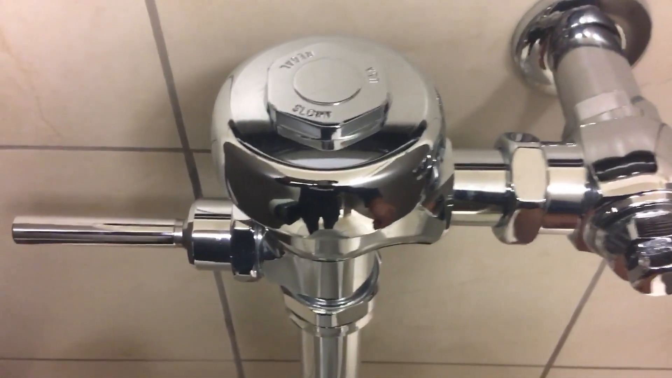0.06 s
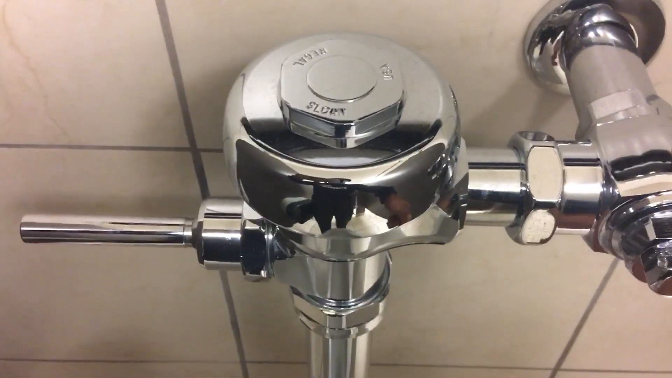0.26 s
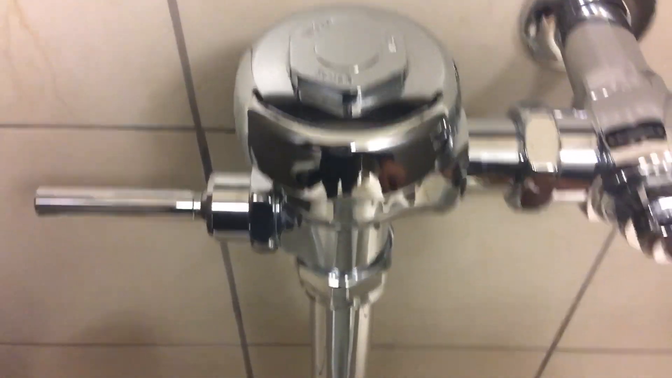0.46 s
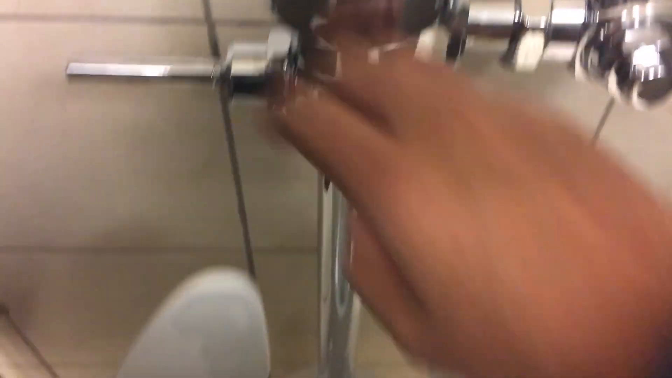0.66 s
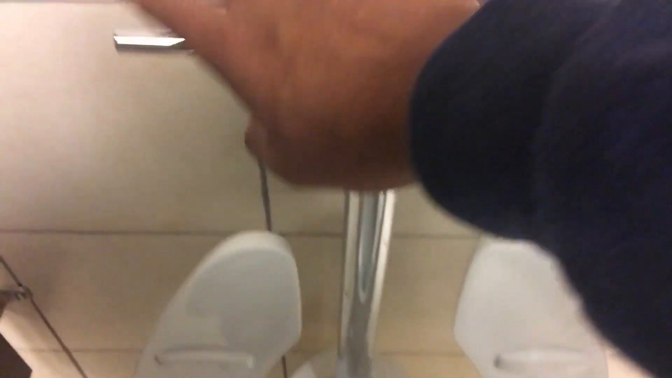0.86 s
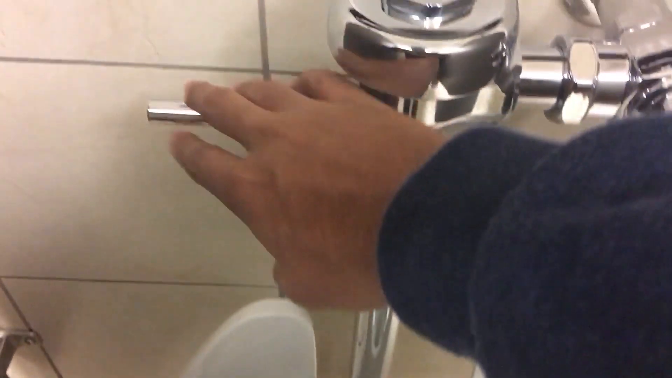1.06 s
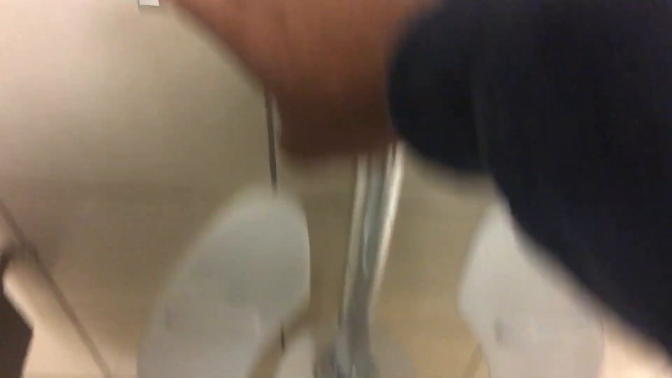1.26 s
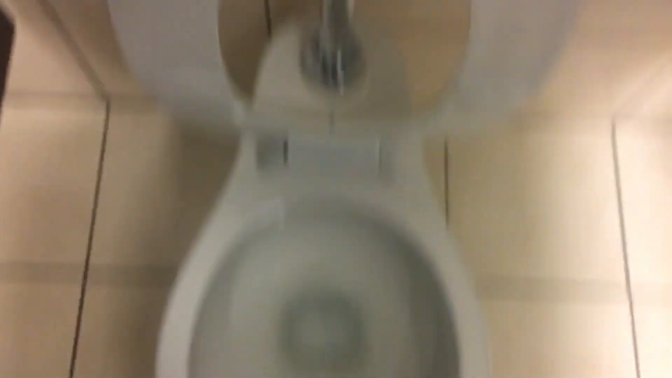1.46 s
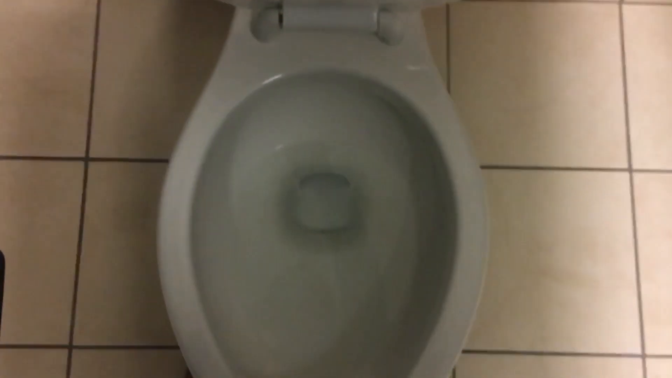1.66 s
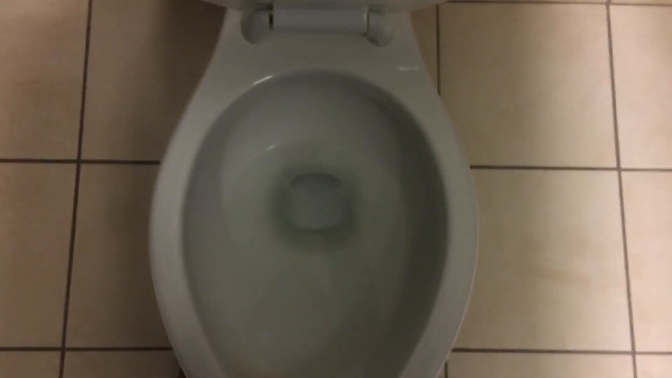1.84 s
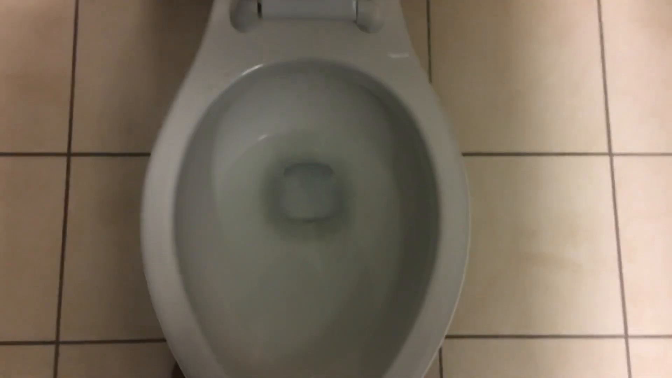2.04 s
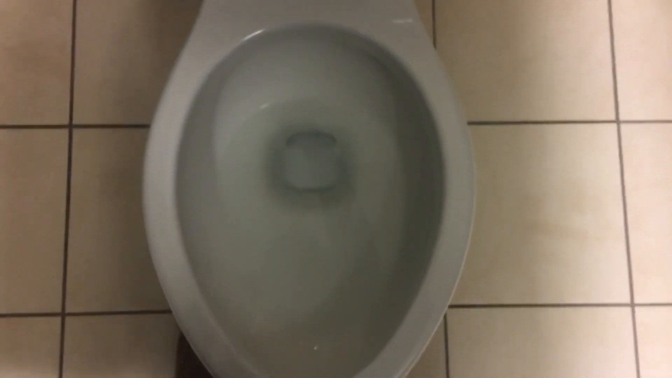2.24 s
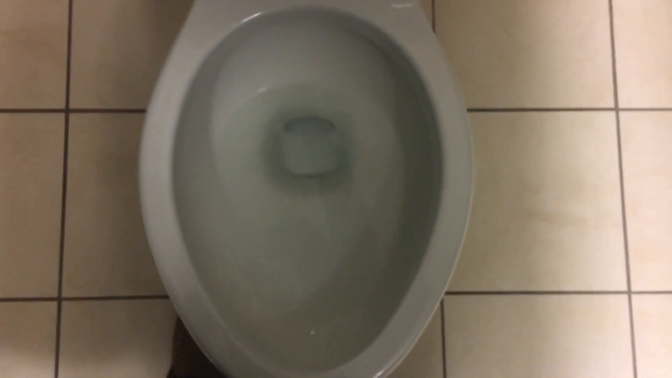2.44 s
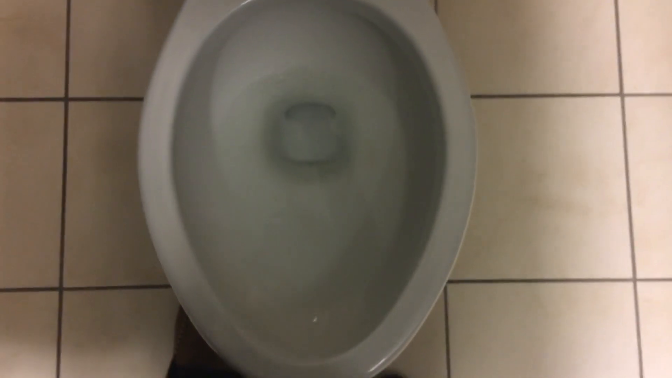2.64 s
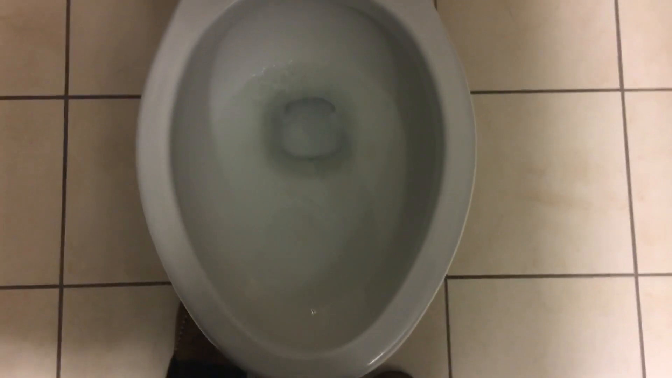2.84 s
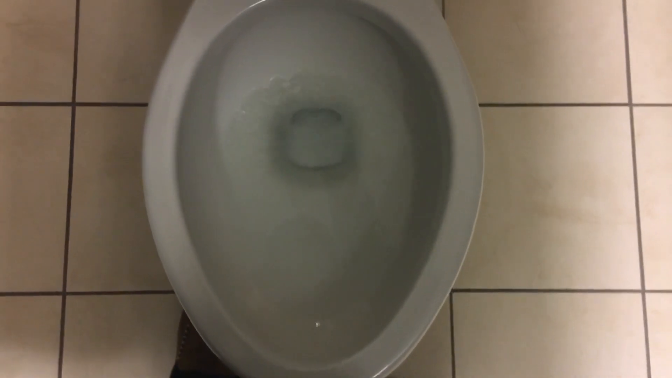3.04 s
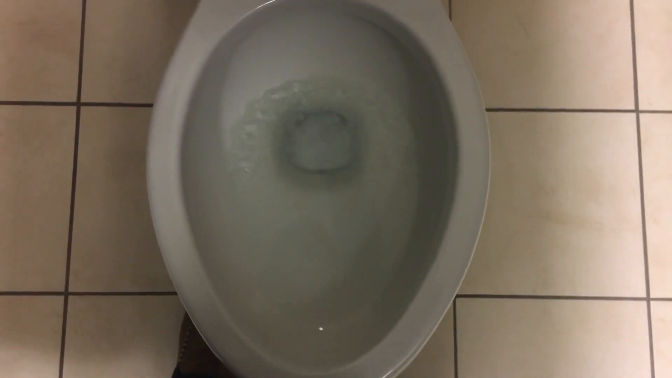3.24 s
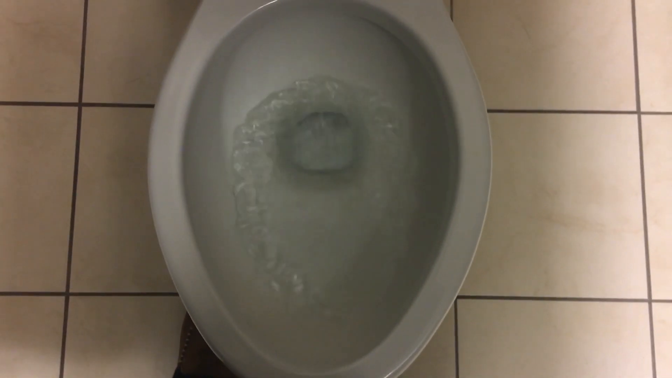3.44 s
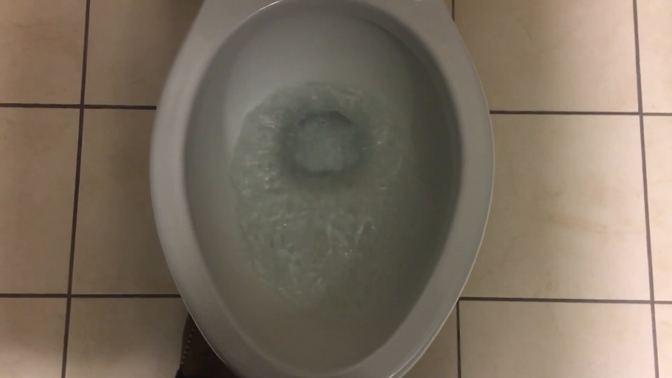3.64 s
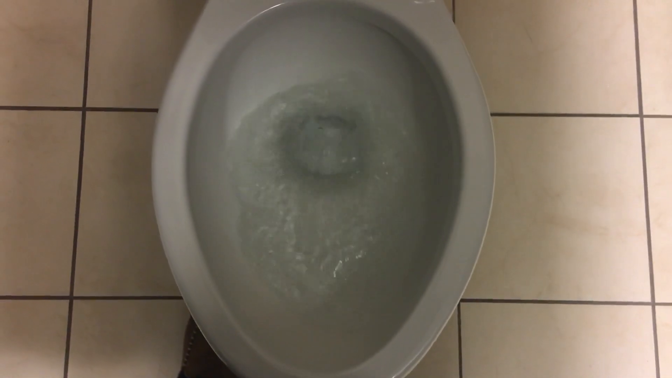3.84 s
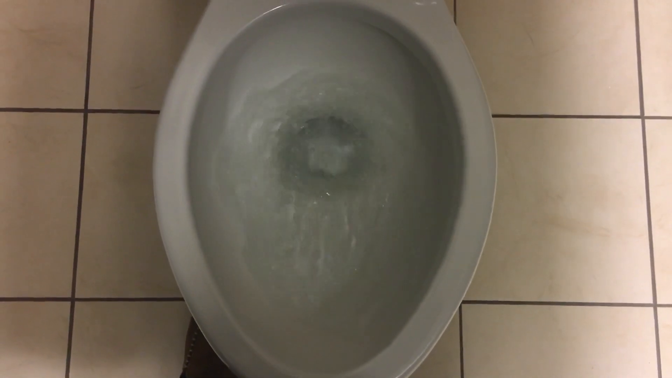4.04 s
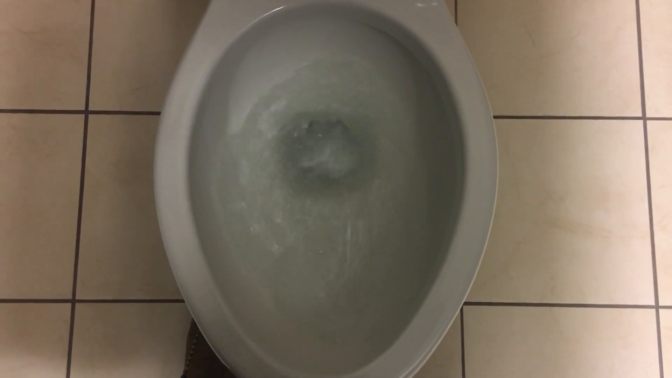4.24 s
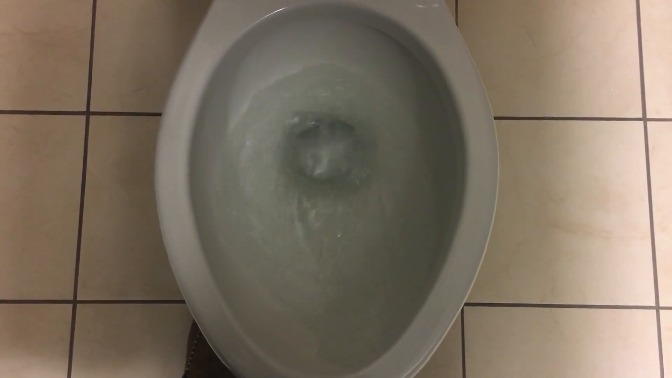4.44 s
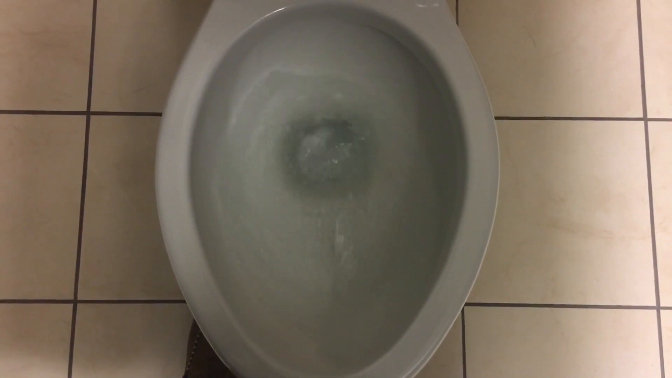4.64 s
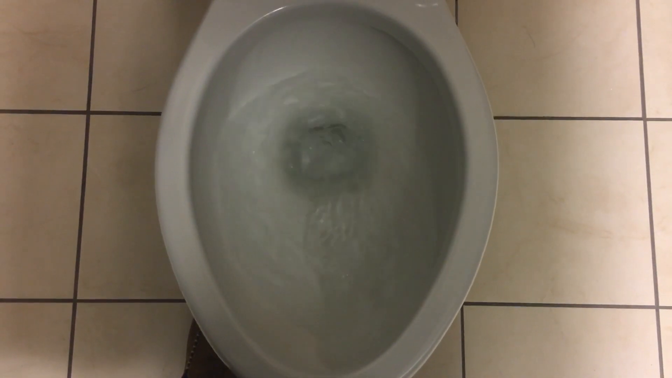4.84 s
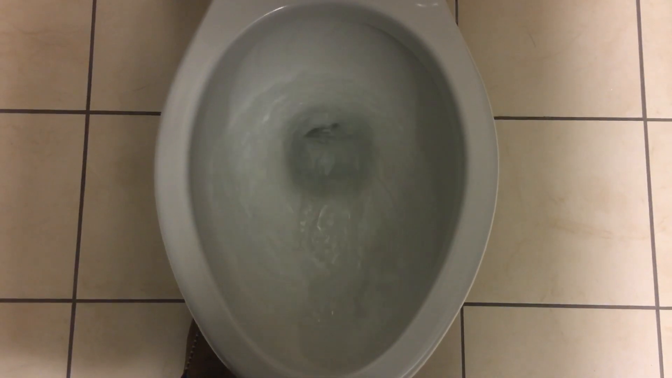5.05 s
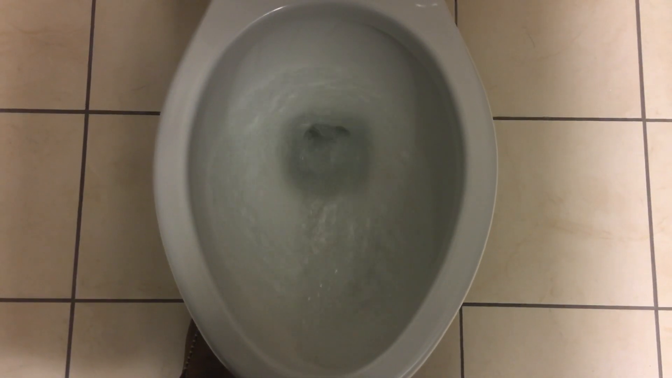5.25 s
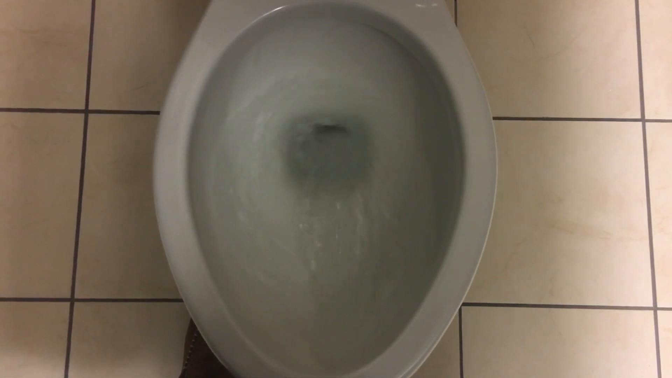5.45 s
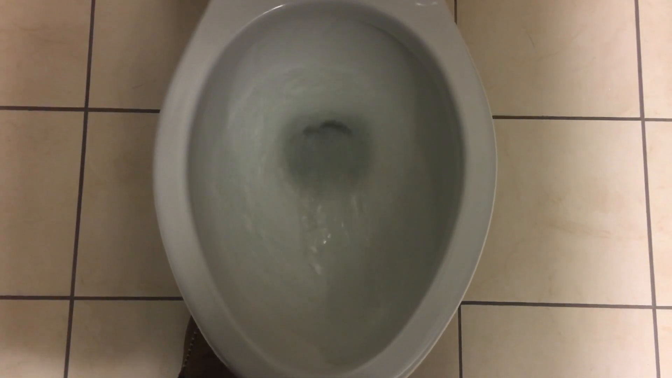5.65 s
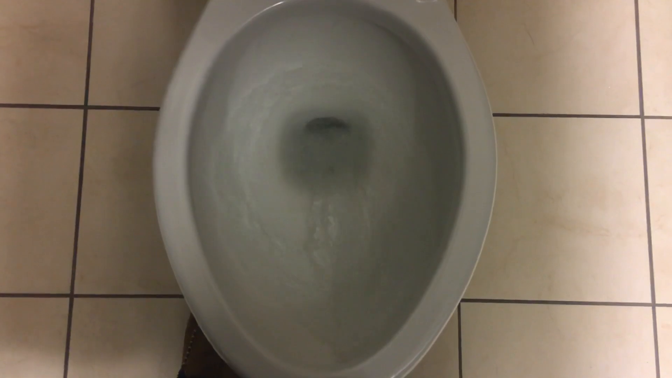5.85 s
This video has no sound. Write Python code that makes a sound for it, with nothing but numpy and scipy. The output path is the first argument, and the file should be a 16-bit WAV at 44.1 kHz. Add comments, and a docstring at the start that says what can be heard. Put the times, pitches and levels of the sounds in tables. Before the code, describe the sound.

A quiet, low ventilation rumble runs throughout in a tiled restroom, heard from just above a toilet. From about 0.5 to 1.3 seconds a sleeve rustles faintly, and at 1.1 the flush handle gives a soft knock and thump. At about 2 seconds the valve opens with a sharp metallic clunk and a few low thuds, then hisses steadily while the pipe rumbles and hums. A faint, brief whistle comes at 2.6 with small spits of air. From 2.8 spluttering jets build into a loud roar of water, strongest around 3.5, with bright spray and churning. After 4 seconds the rush eases slightly and turns hollower as the bowl drains, with sharp splashes on the porcelain. The drain slurps near 4.9 and gulps repeatedly from 4.7 onward. The water is still rushing at the end, around 6 seconds.

```python
"""Rim jets roar into the bowl of a flush-valve toilet, heard from just above it in a tiled restroom.
First a sleeve rustles, the handle knocks, the valve hisses and water rumbles up the pipe, spitting air.
Then the jets open up; as the bowl drains its resonances shift, spray spatters and the trap gulps.
Ventilation rumbles underneath."""
import sys
import numpy as np
from scipy import signal
from scipy.fft import rfft, irfft, next_fast_len
from scipy.io import wavfile
from scipy.ndimage import uniform_filter1d

SR = 44100
rng = np.random.default_rng(int(sys.argv[2]) if len(sys.argv) > 2 else 0)


def transcribe(u):
    """Save the signal u as a 16-bit wav file named by the first command-line argument.

    u: samples, shape (n,) or (channels, n), limited to [-1, 1]; the rate is SR.
    q: integer samples, one column per channel.
    """
    v = np.clip(np.atleast_2d(u).T, -1, 1)
    q = np.round(v * 32767).astype(np.int16)
    wavfile.write(sys.argv[1], SR, q)


N = 260190
TIME = np.arange(N) / SR
CRACK_S, LIFT_S, LIFT_RISE_S = 2.028, 2.115, 0.062  # valve cracks open, then lifts off its seat
JET_START_S, JET_RISE_S = 2.8, 0.27

# valve body resonances: (centre [Hz], width [Hz], lift [dB])
VALVE_MODES = [(1060, 220, 6.5), (1520, 36, 10), (2047, 68, 10.5), (2355, 350, 11), (3790, 130, 8),
               (4200, 170, 6), (5680, 260, 4), (6710, 130, 6), (8800, 200, 1), (9300, 910, 3),
               (12200, 510, 4), (13800, 600, 8.5)]
# drained bowl and rim channel resonances: (centre [Hz], width [Hz], lift [dB])
DRAINED_MODES = [(392.5, 9.5, 14), (470, 84, -1.5), (665, 43, 9.5), (825, 24, 13), (1046, 35, 9.5),
                 (1245, 36, 8), (1335, 26, 10), (1730, 42, 1.5), (1824, 64, -12.5), (1980, 22, 7),
                 (2100, 220, -4.5), (2339, 40, 8.5), (2560, 110, 4.5), (2884, 93, 7), (3240, 120, 8),
                 (3680, 66, 5), (3840, 85, 0.5), (4370, 75, 7)]


def amp(db):
    """Decibels to gain."""
    return 10 ** (np.asarray(db) / 20)


def unit(x):
    """Scale to rms 1."""
    return x / np.sqrt(np.mean(x ** 2) + 1e-20)


def read(points, hz):
    """Interpolate on a log-frequency axis."""
    f, value = np.transpose(points)
    return np.interp(np.log(hz + 1), np.log(f + 1), value)


def add(mix, s, sound):
    """Mix a sound in at time s."""
    part = mix[round(s * SR):][:len(sound)]
    part += sound[:len(part)]


def ramp(start_s, length_s):
    """Linear rise from 0 to 1, then hold."""
    return np.clip((TIME - start_s) / length_s, 0, 1)


def release(s, fall_s):
    """Hold 1 until s, then decay."""
    return np.exp(-np.clip((TIME - s) / fall_s, 0, 20))


def bell(s, width_s):
    """Gaussian swell to 1 at s."""
    return np.exp(-np.minimum(((TIME - s) / width_s) ** 2, 20))


def surge(s, rise_s, fall_s):
    """Swell to 1 at s, then decay."""
    return np.where(TIME < s, bell(s, rise_s), release(s, fall_s))


def drift(rate_hz, size=N):
    """Smooth random wander, rms 1."""
    lowpass = np.exp(-np.minimum((np.fft.rfftfreq(size, 1 / SR) / rate_hz) ** 2, 20))
    return unit(irfft(rfft(rng.standard_normal(size)) * lowpass, size))


def lift(modes, hz):
    """Cavity peaks and notches in dB."""
    return sum(db * np.exp(-np.minimum(2 * ((hz - centre) / width) ** 2, 20))
               for centre, width, db in modes)


def colour(x, spectrum, modes=()):
    """Filter by a broad spectrum and resonances; rms 1."""
    size = next_fast_len(N + SR // 4)
    hz = np.fft.rfftfreq(size, 1 / SR)
    gain = amp(read(spectrum, hz) + lift(modes, hz))
    return unit(irfft(rfft(np.resize(x, size)) * gain, size)[:N])


def turbulence(patch_db, flicker_db, bins, frames):
    """Eddying noise: level varies in time-frequency patches, plus a broadband flicker."""
    z = signal.stft(rng.standard_normal(N), nperseg=256)[2]
    patches = uniform_filter1d(rng.standard_normal(z.shape), bins, axis=0)
    patches = unit(uniform_filter1d(patches, frames, axis=1))
    flicker = unit(uniform_filter1d(rng.standard_normal(z.shape[1]), frames))
    eddies = z * amp(patch_db * patches + flicker_db * flicker)
    return unit(signal.istft(eddies, nperseg=256)[1][:N])


def bubble(hz, t60_s, glide):
    """Damped tone, soft onset; glide lifts the pitch, as in an air pocket nearing the surface."""
    age = np.arange(int(t60_s * SR) + 2) / (t60_s * SR)
    turns = hz * t60_s * age * (1 + glide * age / 2)
    return np.sin(2 * np.pi * turns) * amp(-60 * age) * (1 - np.exp(-age * 40))


def bubbles(low_hz, high_hz, per_s, cycles, spread_db):
    """Bubbles at random times and pitches, a few strong; rms 1."""
    out = np.zeros(N)
    draws = rng.random((8000, 3))
    for when, pitch, strength in draws[:int(per_s * N / SR)]:
        hz = low_hz * (high_hz / low_hz) ** pitch
        gain = np.sqrt(hz) * amp(spread_db * min(-np.log(strength), 3))
        add(out, when * N / SR, gain * bubble(hz, cycles / hz, glide=0.041))
    return unit(out)


def bursts(rows, modes, attack_s):
    """Short blows: resonant noise bands, fast attack, exponential decay."""
    out, t = np.zeros(N), np.arange(SR // 2) / SR
    hz = np.fft.rfftfreq(len(t), 1 / SR)
    for s, db, centre_hz, octaves, t60_s in rows:
        band = np.exp(-0.5 * (np.log2((hz + 1) / centre_hz) / octaves) ** 2) * amp(lift(modes, hz))
        noise = unit(irfft(rfft(rng.standard_normal(len(t))) * band, len(t)))
        envelope = (1 - np.exp(-t / attack_s)) * amp(-60 * t / t60_s)
        add(out, s, amp(db) * envelope * noise)
    return out


def restroom(x):
    """Tile reflections, dying fastest in the treble."""
    # room decay: (frequency [Hz], t60 [s])
    decay = [(100, 0.43), (1000, 0.88), (4000, 0.25), (15000, 0.13)]
    size = SR // 2
    taps = rng.standard_normal(size) * (rng.random(size) < 0.1)
    taps[:201] = 0  # pre-delay
    hz, t, z = signal.stft(taps, SR, nperseg=256)
    tail = signal.istft(z * amp(-60 * t / read(decay, hz)[:, None]), SR, nperseg=256)[1]
    return signal.fftconvolve(x, tail / np.linalg.norm(tail))[:N]


def ventilation(level_db=-43):
    """Steady low rumble of the building's air."""
    # air noise: (frequency [Hz], level [dB])
    spectrum = [(20, -41), (35, -7.5), (58, 4), (83, -10.5), (140, -6), (175, -15), (250, -20.5),
                (350, -30.5), (550, -40), (1100, -44.5), (2000, -48.5), (4800, -54), (8000, -54),
                (12500, -50.5), (15500, -51)]
    return amp(level_db) * colour(rng.standard_normal(N), spectrum)


def sleeve():
    """Cloth slides as the arm comes up, presses the handle and draws back."""
    # arm strokes: (peak time [s], level [dB], rise [s], fall [s])
    strokes = [(.62, -63, .11, .25), (.94, -57, 0.15, 0.38), (1.27, -67, 0.09, .1)]
    # cloth friction: (frequency [Hz], level [dB])
    spectrum = [(150, 21), (400, 14), (900, 3.5), (1600, 0), (2300, 1), (5000, -2), (6200, -1), (8000, -7),
                (12300, 1.5), (15500, -5)]
    rubbing = turbulence(patch_db=2.2, flicker_db=0.6, bins=4, frames=25)
    motion = sum(amp(db) * surge(s, rise_s, fall_s) for s, db, rise_s, fall_s in strokes)
    return motion * colour(rubbing, spectrum)


def squeaks():
    """Faint squeaks and a valve whistle: narrow noise bands that glide, swell and fade."""
    # glides: (time [s], length [s], relative level [dB], start [Hz], end [Hz], width [Hz])
    glides = [(0.02, 0.096, -72, 1387, 1300, 70), (0.071, 0.047, -67, 2600, 2400, 400),
              (1.612, 0.064, -64, 1880, 1700, 220), (1.614, 0.057, -72, 3000, 3200, 300),
              (1.68, 0.22, -81, 1790, 1740, 200), (2.591, .15, -46, 5360, 6080, 300)]
    out = np.zeros(N)
    for s, length_s, db, start_hz, end_hz, width_hz in glides:
        size = int(length_s * SR)
        phase = 2 * np.pi * np.cumsum(np.linspace(start_hz, end_hz, size)) / SR
        a, b = (drift(width_hz / 2, size=SR)[:size] for _ in range(2))
        fuzz = unit(a * np.cos(phase) + b * np.sin(phase))
        add(out, s, amp(db) * fuzz * np.sin(np.linspace(0, np.pi, size)))
    return out


def knocks():
    """Handle and valve knocks and the first spurt ring the valve body."""
    # blows: (time [s], level [dB], centre [Hz], width [octaves], t60 [s])
    blows = [(1.007, -60, 1150, .4, 0.08), (1.085, -45.5, 1030, 0.41, 0.05), (1.09, -47, 12000, 0.36, .02),
             (1.969, -53, 2200, 0.92, 0.07), (1.972, -55, 890, 0.18, 0.25), (2.065, -27, 3400, 0.54, 0.04),
             (2.066, -30, 1100, 1.2, 0.081), (2.065, -37, 10000, .6, .04), (2.183, -34, 1150, 0.59, 0.046),
             (2.178, -30.5, 14000, 0.46, 0.34)]
    return bursts(blows, VALVE_MODES, attack_s=0.0014)


def jolts():
    """The handle thumps and the water column jolts."""
    # low thumps: (time [s], level [dB], pitch [Hz], t60 [s])
    thumps = [(1.091, -27, 94, 0.1), (2.04, -21.5, 73.4, 0.19), (2.066, -21, 130, 0.23),
              (2.131, -15.5, 100, 0.1), (2.182, -20, 110, .1), (2.424, -18, 85, 0.15)]
    out = np.zeros(N)
    for s, db, hz, t60_s in thumps:
        add(out, s, amp(db) * bubble(hz, t60_s, glide=0))
    return out


def valve(leak_db=-53, open_db=-37.5):
    """Water squeezes through the valve seat: a leak, then a full hiss."""
    # seat hiss: (frequency [Hz], level [dB])
    spectrum = [(260, -17), (450, 0.5), (750, -4), (1400, -4.5), (1800, -6.5), (2400, -11), (2800, -6.5),
                (3900, -10), (5500, -5.5), (8000, -6), (11000, -2.5), (14200, -5), (15500, -0.5)]
    hiss = turbulence(patch_db=1.5, flicker_db=1.0, bins=6, frames=8)
    opening = amp(leak_db) * ramp(CRACK_S, 0.01) + amp(open_db) * ramp(LIFT_S, LIFT_RISE_S)
    return opening * colour(hiss, spectrum, VALVE_MODES)


def pipe(purged_s=3.334, settle_s=0.13, hum_hz=91, wander_hz=2.22, waver_db=2.0):
    """The pipe shakes and hums at its lowest resonance, hardest until its air is driven out."""
    # pipe rumble: (frequency [Hz], level [dB])
    rumble_spectrum = [(30, -24), (62, 4.5), (85, 0.5), (110, -2.5), (135, -1), (160, -5), (190, -13.5),
                       (260, -7), (330, -14), (420, -21), (600, -44)]
    # last air drumming out of the rim channel: (frequency [Hz], level [dB])
    purge_spectrum = [(80, -15), (140, 2.5), (185, -9), (255, -3.5), (340, -5), (400, -8), (550, -15.5),
                      (900, -47)]
    # pipe resonances: (centre [Hz], width [Hz], lift [dB])
    modes = [(140.4, 12, 7), (280, 25, 3.5), (336, 8.1, 6.5)]
    # hum swells once the bowl runs low: (time [s], level [dB])
    swells = [(4.99, -38.5), (5.55, -42), (5.83, -40.5)]
    first_rush = amp(-36) * release(LIFT_S, fall_s=0.25)
    trapped_air = amp(-38) * release(purged_s, settle_s)
    shaking = ramp(CRACK_S, 0.07) * (amp(-45) + first_rush + trapped_air)
    rumble = shaking * colour(rng.standard_normal(N), rumble_spectrum, modes)
    drumming = amp(-30.5) * surge(purged_s, rise_s=0.3, fall_s=settle_s)
    purge = drumming * colour(rng.standard_normal(N), purge_spectrum, modes)
    hum_gain = amp(-50) + amp(-33) * release(purged_s, fall_s=0.33)
    hum_gain += sum(amp(db) * bell(s, width_s=0.15) for s, db in swells)
    turns = np.cumsum(hum_hz + wander_hz * drift(rate_hz=7.9)) / SR
    hum_gain *= ramp(LIFT_S, LIFT_RISE_S) * amp(waver_db * drift(rate_hz=2.4))
    return rumble + purge + hum_gain * unit(np.sin(2 * np.pi * turns))


def flow(unsteady_db=0.47):
    """Force of the water in dB; drives jets, spray and churn."""
    # force through the rim jets: (time [s], relative level [dB])
    force = [(2.86, -43), (3.18, -30.5), (3.31, -18), (3.48, -14.5), (3.8, -18.5), (3.83, -15), (4.07, -19),
             (4.25, -19), (4.77, -21.5), (4.88, -19), (5.04, -25), (5.22, -21.5), (5.36, -24), (5.58, -21),
             (5.76, -29), (5.81, -19), (5.84, -25.5), (5.9, -24)]
    return np.interp(TIME, *np.transpose(force)) + unsteady_db * drift(rate_hz=5.3)


def emptied():
    """Share of the bowl drained."""
    # drain curve: (time [s], share emptied [0-1])
    curve = [(4.0, 0.22), (4.35, 0.62), (4.65, 0.89), (5.1, 0.84)]
    return np.interp(TIME, *np.transpose(curve))


def in_bowl(x, spectrum):
    """Bowl resonances crossfade from full to drained as the water falls."""
    # full bowl and rim channel resonances: (centre [Hz], width [Hz], lift [dB])
    full_modes = [(282, 71, 2.5), (399.5, 16, 11.5), (650, 230, 3), (1022, 70, 8), (1168, 106, -24),
                  (1275, 26, 10), (1351, 57, 9.5), (1460, 92, -19), (1616, 26, 12.5), (1963, 31, 7.5),
                  (2280, 115, 7), (2600, 60, -11), (2915, 51, 5.5), (2980, 79, 8.5), (3220, 92, 1),
                  (3565, 58, 10.5), (4300, 190, 4)]
    share = emptied()
    return (1 - share) * colour(x, spectrum, full_modes) + share * colour(x, spectrum, DRAINED_MODES)


def slurp(level_db=-32.5, flutter_db=3.6):
    """The trap sucks air with a fluttering, hollow rasp."""
    # suction rasp: (frequency [Hz], level [dB])
    spectrum = [(600, -30), (1000, -7), (1250, 0), (1450, -6), (2000, -28), (6000, -50)]
    rasp = amp(flutter_db * drift(rate_hz=40)) * rng.standard_normal(N)
    return amp(level_db) * surge(4.92, rise_s=0.24, fall_s=0.3) * colour(rasp, spectrum)


def gulps(pitch_scatter=0.174, stagger_s=0.014, fragment_db=-6, fragments=6):
    """Each gulp is one large bubble breaking into a few weaker ones."""
    # air pockets swallowed by the trap: (time [s], level [dB], pitch [Hz], t60 [s])
    pockets = [(4.694, -23, 1105, 0.043), (4.794, -21, 1080, 0.082), (4.955, -21.5, 1057, 0.21),
               (4.985, -21, 1137, .12), (5.158, -15.5, 927, 0.043), (5.208, -19, 608, 0.045),
               (5.402, -27, 1160, 0.059), (5.525, -24, 784, 0.079), (5.671, -21.5, 920, 0.045),
               (5.721, -19.5, 1094, 0.093), (5.728, -23, 510, .045), (5.83, -21.5, 930, 0.09)]
    out = np.zeros(N)
    for s, db, hz, t60_s in pockets:
        add(out, s, amp(db) * bubble(hz, t60_s, glide=0.091))
        waits_s = rng.exponential(stagger_s, fragments)
        ratios = np.exp(pitch_scatter * rng.standard_normal(fragments))
        for wait_s, ratio in zip(waits_s, ratios):
            add(out, s + wait_s, amp(db + fragment_db) * bubble(hz * ratio, t60_s / 2, glide=0.21))
    return out


def splashes(t60_s=0.042, max_octaves=0.74):
    """Short slaps ring in the bowl; the higher ones span fewer octaves."""
    # spits of air and slaps of water: (time [s], level [dB], centre [Hz])
    slaps = [(2.597, -35, 2190), (2.637, -35, 2750), (2.897, -36, 2630), (2.94, -34.5, 2820),
             (3.003, -33, 2540), (3.075, -27.5, 3000), (3.182, -28, 7130), (3.207, -21.5, 4500),
             (4.338, -14, 5000), (4.618, -16.5, 3500), (4.92, -9, 7900), (5.148, -15.5, 5000),
             (5.224, -13, 4310), (5.332, -10.5, 12100), (5.406, -9, 7450), (5.463, -12, 11100),
             (5.779, -14, 4470), (5.809, -13, 5870)]
    rows = [(s, db, hz, min(4100 / hz, max_octaves), t60_s) for s, db, hz in slaps]
    return bursts(rows, DRAINED_MODES, attack_s=0.0012)


def churn(flow_db, db_per_flow_db=0.68, drained_db=-5.5):
    """Bowl water tumbles, folds in larger bubbles and heaves; the tumbling thins as it drains."""
    # tumbling water: (frequency [Hz], level [dB])
    tumble_spectrum = [(130, -9), (210, -7), (280, 3), (400, -3), (520, -4), (700, 1.5), (950, -7.5),
                       (1300, -3.5), (2200, -10.5)]
    # hollow slosh: (frequency [Hz], level [dB])
    slosh_spectrum = [(250, -17.5), (500, 0), (650, 7), (950, 1), (1400, -7.5), (2400, -3.5)]
    # heaves of the water: (time [s], level [dB])
    heaves = [(2.9, -39), (3.72, -27), (4.66, -36), (4.87, -42), (5.21, -29), (5.57, -26), (5.72, -30),
              (5.81, -29), (5.89, -35)]
    swirl = turbulence(patch_db=2.1, flicker_db=-0.2, bins=2, frames=10)
    water = swirl + amp(-17) * bubbles(301.4, 1298, per_s=130, cycles=36, spread_db=5)
    level_db = -15 + db_per_flow_db * flow_db + drained_db * emptied()
    tumbling = ramp(JET_START_S, JET_RISE_S) * amp(level_db)
    sloshing = sum(amp(db) * surge(s, rise_s=0.014, fall_s=0.023) for s, db in heaves)
    return tumbling * in_bowl(water, tumble_spectrum) + sloshing * colour(water, slosh_spectrum)


def spray(flow_db, db_per_flow_db=0.8, bared_db=1.5, burst_db=1):
    """As the jets reach full force, droplets patter on foam and, louder, on bared porcelain."""
    # droplet hiss: (frequency [Hz], level [dB])
    spectrum = [(3500, -33), (4700, -3), (5400, -0.5), (6400, 1), (7200, -2), (8300, 0), (9600, 0.5),
                (12000, 0), (13500, -0.8), (14500, -2.5), (15700, -5)]
    # reflections off porcelain and wall: (delay [s], gain [linear])
    echoes = [(.0018, 0.069), (.0031, 0.095), (.0053, .2), (.0087, 0.17)]
    mist = turbulence(patch_db=1.5, flicker_db=1.27, bins=12, frames=4)
    direct = mist + amp(-14) * bubbles(5000, 15000, per_s=700, cycles=70, spread_db=5)
    reflected = sum(gain * np.roll(direct, round(delay_s * SR)) for delay_s, gain in echoes)
    level_db = -3 + db_per_flow_db * flow_db + bared_db * emptied()
    level_db += burst_db * bell(3.407, width_s=0.21)
    onset = ramp(start_s=3.15, length_s=0.22) ** 2
    return onset * amp(level_db) * colour(direct + reflected, spectrum)


def jets(flow_db, gain_db=-1.42):
    """Rim jets splutter while air is left in the channel, then rush with a fizz of small bubbles."""
    # jet roar: (frequency [Hz], level [dB])
    spectrum = [(600, -22), (950, -5.5), (1300, -3), (1800, -0.5), (2600, -1.5), (3800, -1), (4600, -2),
                (5400, -3), (7000, -10), (11000, -35)]
    rush = turbulence(patch_db=1.0, flicker_db=1.0, bins=7, frames=7)
    fizz = amp(-14.5) * bubbles(994, 4980, per_s=490, cycles=34, spread_db=4)
    air_left = 1 - ramp(start_s=3.2, length_s=0.29)
    splutter_db = 1.4 * air_left * drift(rate_hz=59)
    envelope = ramp(JET_START_S, JET_RISE_S) * amp(gain_db + flow_db + splutter_db)
    return envelope * in_bowl(rush + fizz, spectrum)


def scene():
    """All sources, both channels alike; near events and far squeaks echo, the squeaks most."""
    near = knocks() + splashes() + gulps()
    far = squeaks()
    flow_db = flow()
    water = valve() + pipe() + jolts() + jets(flow_db) + spray(flow_db) + churn(flow_db) + slurp()
    echo = restroom(amp(-11) * near + amp(-9) * far)
    mix = ventilation() + sleeve() + water + near + amp(-2.5) * far + echo
    return np.array([mix, mix])


def record(dry, ceiling=0.92, cutoff_hz=15780):
    """Microphone port notches, soft peak limit, low-pass."""
    # port notches: (centre [Hz], width [Hz], lift [dB])
    notches = [(4960, 270, -4.5), (7600, 170, -4.5), (10370, 590, -4.5)]
    hz = np.linspace(0, SR / 2, 513)
    port = signal.firwin2(513, hz, amp(lift(notches, hz)), fs=SR)
    heard = signal.oaconvolve(dry, port[None], "same")
    limited = heard / (1 + (heard / ceiling) ** 8) ** (1 / 8)
    lowpass = signal.firwin(1023, cutoff_hz, window=("kaiser", 9), fs=SR)
    return signal.oaconvolve(limited, lowpass[None], "same")


dry = scene()
out = record(dry)
transcribe(out)
```